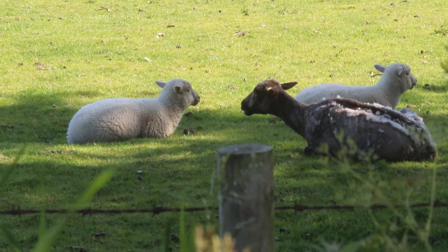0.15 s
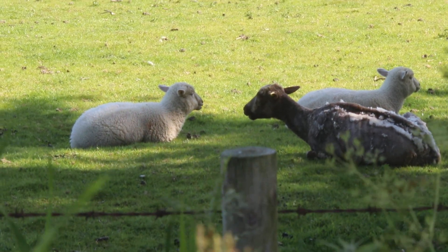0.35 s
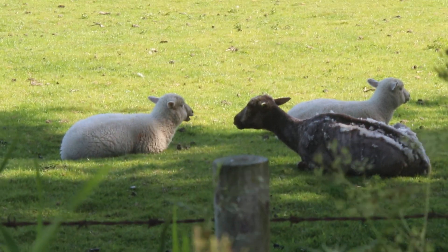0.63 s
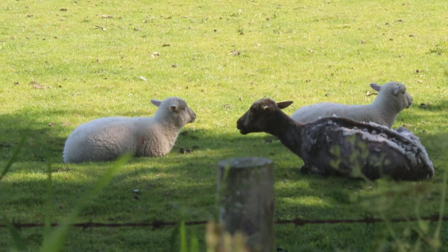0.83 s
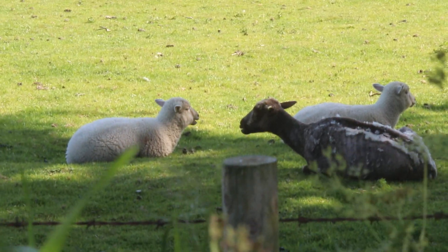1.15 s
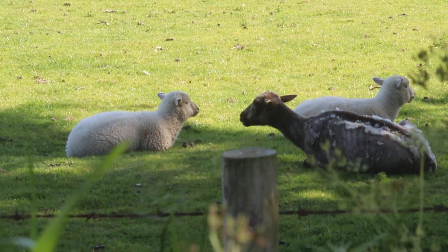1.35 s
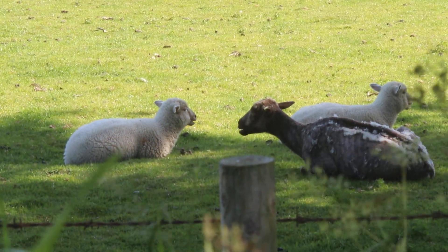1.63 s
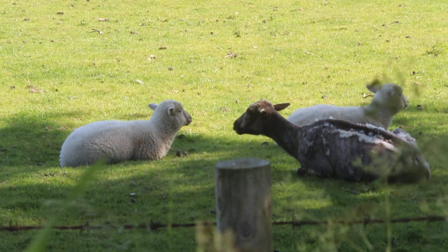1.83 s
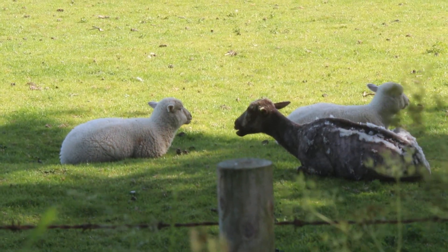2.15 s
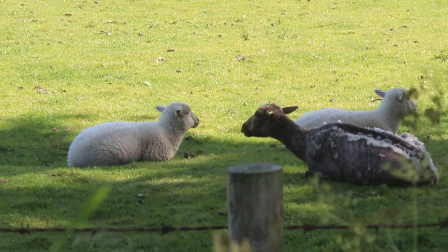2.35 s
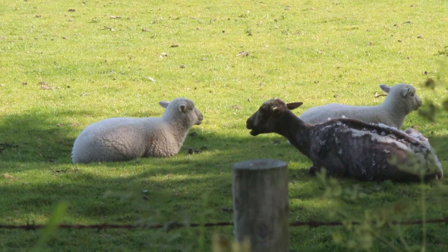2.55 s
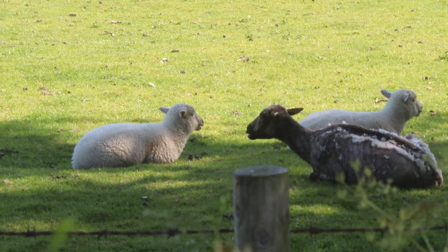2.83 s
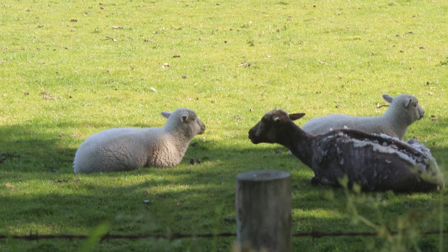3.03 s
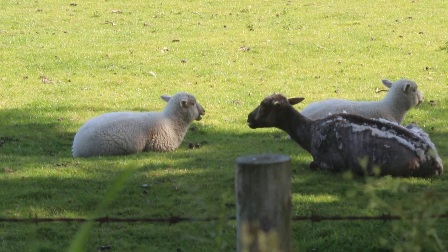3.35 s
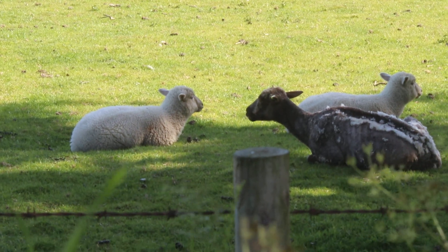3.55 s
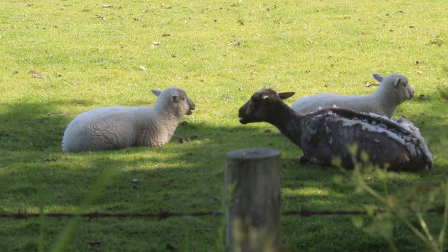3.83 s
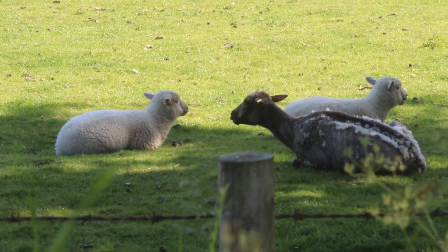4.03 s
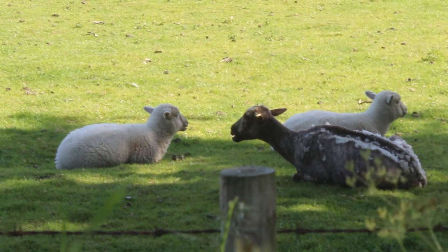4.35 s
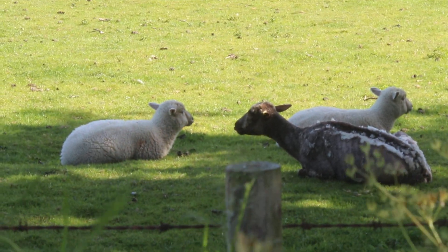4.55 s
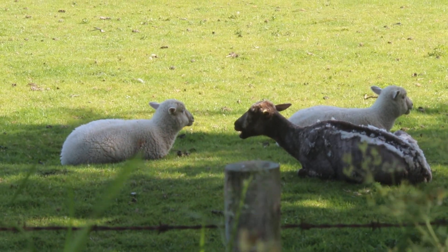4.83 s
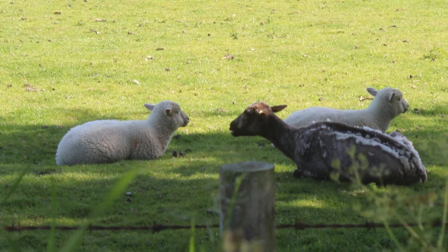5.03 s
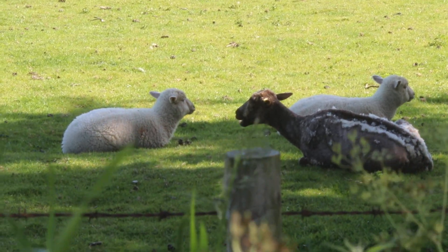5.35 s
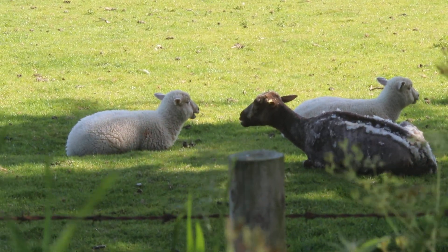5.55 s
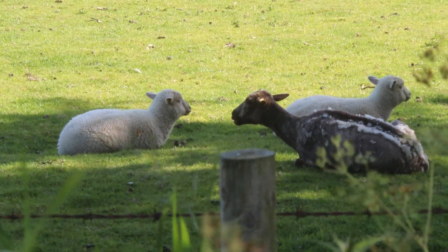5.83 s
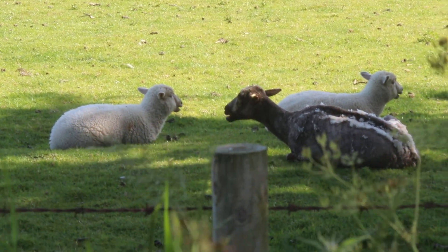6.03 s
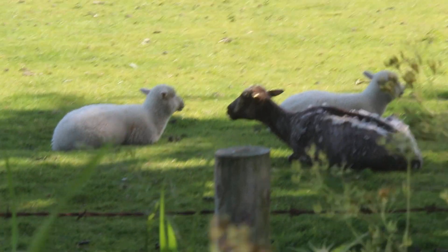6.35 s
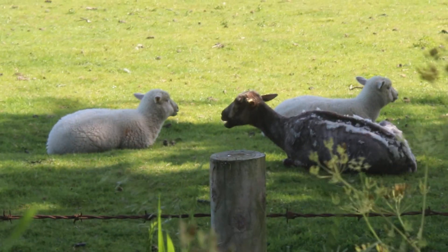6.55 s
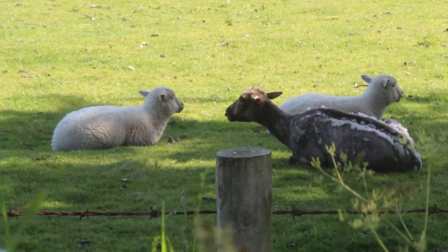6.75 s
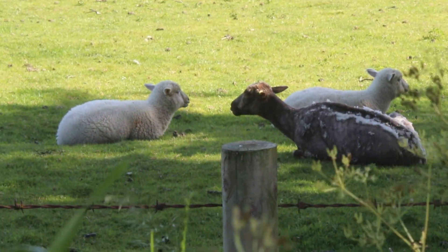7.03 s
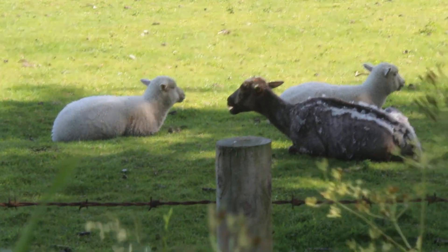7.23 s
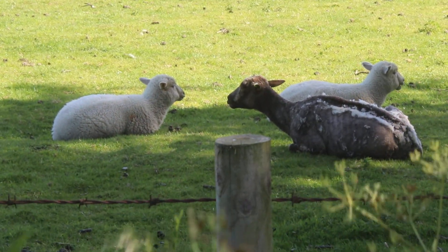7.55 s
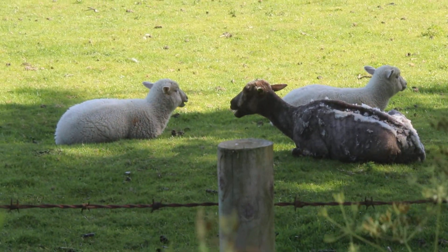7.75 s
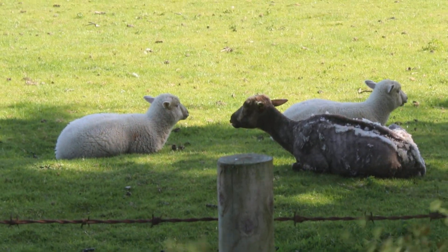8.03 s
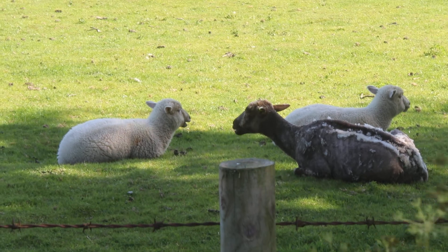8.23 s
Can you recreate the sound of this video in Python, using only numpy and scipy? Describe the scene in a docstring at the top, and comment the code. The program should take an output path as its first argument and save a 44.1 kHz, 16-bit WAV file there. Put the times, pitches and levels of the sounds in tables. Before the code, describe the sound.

Wind noise dominates this outdoor stereo field recording. After a calm opening of gentle rustling foliage and barely audible birds, a hard gust slams in just before three seconds. Uneven puffs, thuds and two sharp knocks shift left and right over the hiss of grass, with a descending-pitch chirping trill and thin whistles. Strong gusts return near seven and eight seconds, clamped and crackly, drowning everything else.

```python
"""Wind and birdsong over a pasture

Three long gusts and many short puffs carry eddies over two microphone ports: random pressure swings,
quicker and higher as the wind stiffens, with single hard thumps, slow swells and two knocks.
Coloured noise and ticks make the grass hiss, noise makes the trees murmur, gliding sines the birdsong.
A limiter clamps the strong gusts, so the grass and the birds duck under them."""
import sys
import numpy as np
from scipy import signal
from scipy.fft import rfft, irfft, next_fast_len
from scipy.io import wavfile
from scipy.ndimage import uniform_filter1d, minimum_filter1d, map_coordinates

SR = 44100
rng = np.random.default_rng(int(sys.argv[2]) if len(sys.argv) > 2 else 0)


def dump_mix(stems):
    """Bounce the given channels to the path in sys.argv[1] as a 16-bit WAV at rate SR."""
    frames = np.atleast_2d(stems).T  # one column per channel
    limited = np.clip(frames, -1, 1)  # hard clip at full scale
    pcm = np.round(limited * 32767).astype(np.int16)
    wavfile.write(sys.argv[1], SR, pcm)


N = 369999

# Lean is left minus right, set before the sides mix; levels are set before the limiter.
# wind under the puffs, a lull then three long gusts: start_s, relative_strength_db
WIND = [(0, -52), (1.15, -51), (1.3, -72), (2.05, -58), (2.3, -31), (2.66, -26), (2.74, -5), (2.85, 0),
        (3.02, -4), (3.36, -21), (3.75, -26), (4.7, -27), (5.33, -31.5), (6.15, -29), (6.3, -20),
        (6.72, -2), (6.98, -14), (7.15, -23), (7.45, -30), (7.76, -4), (7.97, -1), (8.17, -6), (8.26, -4),
        (8.39, -6)]
# veering of the wind from port to port: start_s, lean_db
VEER = [(2.3, -1), (2.9, 6.5), (3.6, -3), (4.3, 2), (5.5, 0.5), (6.7, 0), (7.3, 0.5), (7.7, 4.5), (8.39, 1)]
# short puffs: crest_s, length_s, relative_strength_db, lean_db
PUFFS = [(0.0, .07, -37, 12), (0.128, .06, -34, 19), (0.683, .06, -36, -12), (0.831, .09, -34.5, 10),
         (0.97, .13, -26, 1), (1.1, .14, -37, 7), (2.138, .035, -30, -12), (2.415, .11, -9, 0.5),
         (2.516, .11, -9, -8.5), (3.477, .14, -14, 0.5), (3.6, .11, -12, -4), (3.891, .1, -24, 2),
         (4.104, .07, -22, 5), (4.284, .1, -23, 10), (4.428, .12, -9, 8), (4.529, .09, -11, 7),
         (4.878, .13, -14, 1.5), (5.078, .11, -14, 3.5), (5.218, .1, -19.5, 3.5), (5.382, .05, -25, -1),
         (5.493, 0.1103, -20, -6), (5.675, .15, -5, -1.5), (5.82, .05, -19, 0), (5.931, .08, -18, 2),
         (6.023, .07, -11, -4), (6.419, .09, -12, 5), (6.545, .08, -8, 2), (7.075, 0.0591, -13, -12),
         (7.221, .08, -24, -6), (7.59, .11, -14, 2)]
# reference eddy pitch in a wind of strength BREEZE_DB: start_s, pitch_hz
EDDY_PITCH = [(0, 215), (1.0, 194.9), (2.42, 190.2), (2.58, 349.7), (3.05, 464.7), (4.1, 414.9),
              (5.25, 394.8), (5.9, 410.2), (6.5, 469.9), (7.05, 490.2), (7.55, 420.1), (8.15, 650.1)]
# single hard eddies: centre_s, size_db, lean_db
THUMPS = [(2.389, -1, -1), (2.509, 5, -18), (2.567, 4.5, -4), (2.719, 3.5, 21), (2.745, 4, -5),
          (3.104, 6.5, 5), (3.449, 6.5, -5.5), (3.614, 7, -1), (4.035, -9, 10), (4.387, 4, 5),
          (4.424, 5, 13), (4.539, 2, 1), (4.754, -3, 1.5), (4.811, -7, 4), (4.899, 2, -0.5),
          (5.033, -0.5, 14), (5.054, -4, 4), (5.074, 3.5, 2.5), (5.154, -8.5, -8), (5.586, -1, -9),
          (5.627, 4.5, 8), (5.682, 9, -12), (6.032, 6, 0), (6.241, -3, 1), (6.412, 6.5, 3),
          (6.533, 12.5, -7), (6.654, 10, -4), (6.674, 11, -5), (6.691, 15.5, 3.5), (6.805, 13, -18),
          (7.052, 2.5, -17), (7.086, 6.5, -5), (7.218, -2.5, -0.5), (7.26, -6, 1), (7.707, 8, 7),
          (7.879, 13, 11.5), (8.061, 15, 5.5)]
# colour of a microphone port: frequency_hz, gain_db
PORT = [(40, -2), (200, 0), (700, 0), (1600, -2), (4000, 0)]
# likeness of the two sides at the ports: frequency_hz, correlation (0 to 1)
PORT_ALIKE = [(60, .7), (130, .68), (260, .48), (500, .22), (1000, .05), (2000, 0)]
# relative spectrum of slow pressure swells: frequency_hz, density_db (per Hz)
SWELLS = [(15, 3), (30, -34), (60, -10.5), (110, 11), (170, 12.5), (300, -33)]
# sharp knocks on the microphone, alike on both sides: centre_s, thud_db, snap_db
KNOCKS = [(3.4355, 5, -3), (3.5729, 7.5, -9)]
# stirring of the grass, before flutter: start_s, rustle_db
RUSTLE = [(0, -48.5), (1, -48.5), (1.7, -44.5), (2.3, -43), (2.7, -40), (4.2, -39), (7.3, -37.5),
          (8.4, -42.5)]
# relative spectrum of the grass: frequency_hz, density_db (per Hz)
GRASS = [(200, -5.5), (700, 3), (1500, 2), (2200, 1.5), (3200, -0.5), (4500, -2), (5500, -8), (7500, -7),
         (9000, -10), (11000, -16.5), (13000, -16), (15500, -22)]
# likeness of the two sides for grass and trees: frequency_hz, correlation (0 to 1)
AIR_ALIKE = [(150, 1), (330, 0.9), (700, 0.7), (950, 0.3), (1500, 0.24), (3000, 0.034), (9000, 0)]
# bird whistles, before echo: start_s, length_s, start_hz, end_hz, warble (share of pitch), level_db
WHISTLES = [(0.064, 0.16, 2250, 2510, .01, -57), (0.463, 0.117, 2010, 1930, .015, -58),
            (0.712, 0.25, 2560, 2630, 0.027, -58.5), (3.299, .11, 1710, 1930, 0.0055, -41.5),
            (3.48, 0.17, 1784, 1930, .008, -39), (3.75, 0.18, 1896, 2077, 0.007, -39),
            (3.88, 0.094, 2110, 1975, 0.0091, -38), (4.16, 0.099, 2090, 1940, 0.018, -38),
            (4.26, 0.15, 1843, 1810, 0.0092, -40), (4.46, .11, 2230, 2130, .025, -47),
            (4.87, 0.15, 3250, 3230, .03, -49), (4.951, 0.094, 2810, 2780, .028, -41.5),
            (5.2, .11, 2060, 2160, .014, -39), (5.271, 0.16, 1980, 1760, 0.029, -38.5),
            (5.496, 0.11, 2230, 1900, 0.023, -40)]
# falling two-part chirp, levels for the first of the trill: delay_s, length_s, start_hz, end_hz, level_db
CHIRP = [(0, 0.021, 3630, 3400, -45.5), (0.015, .024, 3040, 2730, -44.5)]
# relative spectrum of the trees: frequency_hz, density_db (per Hz)
TREES = [(20, -21), (30, -16), (60, 2.5), (120, -2), (200, 1), (450, -0.5), (1000, 0), (1500, -7),
         (2200, -11), (4500, -21.5), (12000, -43)]
# low cut of the recorder: frequency_hz, gain_db
LOW_CUT = [(20, -21), (50, -12.5), (90, -6), (140, -3), (300, 0)]

BREEZE_DB = -15
DB_PER_OCTAVE = 43  # gain in wind strength that doubles the eddy pitch
THUMP_RATIO = 1.257  # a hard eddy is tighter, so higher, than those around it
TRILL_START_S, TRILL_PERIOD_S, TRILL_CHIRPS = 3.195, .091, 10
TRILL_FADE_DB = 1  # each chirp is this much fainter than the one before
ATTACK_S = .0035  # time constant of the limiter's gain
TOP_HZ = 15750  # band limit


def amp(db):
    """Logarithmic level: decibels to amplitude gain."""
    return 10 ** (np.asarray(db) / 20)


def unit(x):
    """Power normalisation: scale to rms 1."""
    return x / np.sqrt(np.mean(x ** 2) + 1e-20)


def along(points, hz):
    """Logarithmic interpolation: read (Hz, value) points on a log frequency axis."""
    f, v = np.transpose(points)
    return np.interp(np.log(hz + 1), np.log(f + 1), v)


def curves(rows):
    """Linear interpolation in time: one value per sample for each column after the time."""
    s, *cols = np.transpose(rows)
    return [np.interp(np.arange(N) / SR, s, c) for c in cols]


def wobble(rate):
    """Band-limited random drift: a spline through `rate` random knots a second."""
    knots = rng.standard_normal(int(N * rate / SR) + 4)
    return map_coordinates(knots, [np.arange(N) * rate / SR])


def smooth(x, seconds):
    """Moving average: two equal running means make a triangular window."""
    size = max(int(seconds * SR), 1)
    return uniform_filter1d(uniform_filter1d(x, size), size)


def filtered(x, response):
    """Linear filtering: multiply the spectrum by a response of frequency."""
    m = next_fast_len(N + 8192)
    return irfft(rfft(x, m) * response(np.fft.rfftfreq(m, 1 / SR)), m)[..., :N]


def sides(lean_db):
    """Level difference between sides: left and right gains of mean power 1."""
    g = amp(np.array([lean_db, -lean_db]) / 2).reshape(2, -1)
    return g / np.sqrt(np.mean(g ** 2, axis=0))


def blend(pair, spectrum, alike):
    """Partial coherence: colour two unrelated signals and let each leak into the other side."""
    def turn(hz):
        return np.arcsin(np.clip(along(alike, hz), -1, 1)) / 2

    own = filtered(pair, lambda hz: amp(along(spectrum, hz)) * np.cos(turn(hz)))
    leak = filtered(pair[::-1], lambda hz: amp(along(spectrum, hz)) * np.sin(turn(hz)))
    return own + leak


def patchy_noise(patchy_db):
    """Modulated noise: two noises of joint rms 1 with gain patches drifting over time and frequency."""
    spectra = signal.stft(rng.standard_normal((2, N)), nperseg=512)[2]
    field = uniform_filter1d(rng.standard_normal(spectra.shape), size=7, axis=1)
    field = uniform_filter1d(field, size=14, axis=2)
    noise = signal.istft(spectra * amp(patchy_db * unit(field)), nperseg=512)[1]
    return unit(noise[:, :N])


def airflow():
    """Addition of powers: wind and puffs give port gains, strength in dB and eddy pitch."""
    t = np.arange(N) / SR
    power = (amp(curves(WIND)[0]) * sides(curves(VEER)[0])) ** 2
    for s, length, db, lean_db in PUFFS:
        near = slice(max(int((s - 2 * length) * SR), 0), int((s + 2 * length) * SR))
        bell = np.exp(-(2 * (t[near] - s) / length) ** 2)
        power[:, near] += (amp(db) * bell * sides(lean_db)) ** 2
    strength_db = 10 * np.log10(power.mean(axis=0))
    eddy_hz = curves(EDDY_PITCH)[0] * 2 ** ((strength_db - BREEZE_DB) / DB_PER_OCTAVE)
    return np.sqrt(power), strength_db, eddy_hz


def eddies(at, size, hz):
    """Vortex passage: each is one pressure swing, its spectrum falling exponentially above its pitch."""
    k = np.arange(-300, 301)  # samples from the centre
    angle = np.arctan(np.pi * hz[:, None] * k / SR).astype(np.float32)
    phase = rng.uniform(0, 2 * np.pi, (len(at), 1)).astype(np.float32)
    swing = np.cos(angle) ** 3 * np.cos(3 * angle + phase) * np.hanning(len(k))
    # one spare sample at each end collects whatever falls outside
    where = np.clip(at[:, None] + k + 1, 0, N + 1)
    return np.bincount(where.ravel(), (size[:, None] * swing).ravel(), N + 2)[1:N + 1]


def stream(pitch, clump_db, per_cycle, scatter, size_db, clump_rate, sharp_share, sharp_ratio):
    """Advection: faster air brings more eddies over a port, in clumps; a few are tight and crackle."""
    passed = np.cumsum(pitch) * per_cycle / SR  # expected eddy count so far
    at = np.searchsorted(passed, rng.uniform(0, passed[-1], int(passed[-1])))
    chance = np.clip(rng.standard_normal((len(at), 3)), -2, 2)
    # clumps level off at the top, with deep gaps between them
    clumps = np.minimum(1.35 * wobble(clump_rate), 1.5)
    size = amp(size_db * chance[:, 0] + (clump_db * clumps)[at])
    tight = rng.random(len(at)) < sharp_share * (pitch[at] / 600) ** 2
    hz = pitch[at] * np.exp(scatter * chance[:, 1]) * np.where(tight, sharp_ratio, 1)
    return eddies(at, size * np.where(tight, .6, 1), hz)


def buffeting(port_gain, strength_db, eddy_hz, level_db):
    """Turbulence on the ports: light wind comes in separate flaps, strong wind merges into a roar."""
    clump_db = np.interp(strength_db, [-19, -3], [5.6, 3.0])
    ports = np.array([
        stream(eddy_hz * 0.91, clump_db, per_cycle=1.6, scatter=0.16, size_db=3.5,
               clump_rate=75, sharp_share=.09, sharp_ratio=1.54)
        for _ in range(2)])
    # even out the running power, so that it follows the strength of the gust
    ports /= np.sqrt(np.abs(smooth(ports ** 2, .06)) + 1e-9)
    return ports * port_gain * amp(level_db)


def slack(depth_db, lead_s, width_s):
    """Amplitude modulation: the small eddies thin out just ahead of each hard one."""
    t = np.arange(N) / SR
    dip = np.zeros(N)
    for s, _, _ in THUMPS:
        near = slice(int((s - .05) * SR), int((s + .05) * SR))
        dip[near] = np.maximum(dip[near], np.exp(-((t[near] - s + lead_s) / width_s) ** 2))
    return amp(depth_db * dip)


def thumps(eddy_hz, edge_db, edge_ratio, wake_db, wake_s):
    """Impact of a hard eddy, often on one port: a steep edge, the main swing, then a weaker wake."""
    s, size_db, lean_db = np.transpose(THUMPS)
    at = np.round(s * SR).astype(int)
    hz = THUMP_RATIO * eddy_hz[at]
    ports = []
    for size in amp(size_db) * sides(lean_db):
        edge = eddies(at, size * amp(edge_db), hz * edge_ratio)
        main = eddies(at, size, hz)
        wake = eddies(at + int(wake_s * SR), size * amp(wake_db), hz * 0.92)
        ports.append(edge + main + wake)
    return np.array(ports)


def swells(strength_db, level_db, growth):
    """Large-scale turbulence: slow whorls add a rumble that grows less steeply than the buffeting."""
    rumble = unit(blend(patchy_noise(patchy_db=6), SWELLS, PORT_ALIKE))
    return rumble * amp(level_db + growth * strength_db)


def knocks(thud_hz, snap_hz, rebound_hz, rebound_db, rebound_s):
    """Impulse and rebound: a dull thud has a bright snap on its edge and a lower rebound."""
    s, thud_db, snap_db = np.transpose(KNOCKS)

    def swing(delay, db, hz):
        return eddies(np.round((s + delay) * SR).astype(int), amp(db), np.full(len(s), hz))

    thud = swing(0, thud_db, thud_hz)
    snap = swing(0, snap_db, snap_hz)
    return thud + snap + swing(rebound_s, thud_db + rebound_db, rebound_hz)


def grass(tick_rate, tick_db, flutter_db):
    """Friction noise: countless blades rub into a hiss; nearer stalks tick against each other."""
    rustle_db, = curves(RUSTLE)
    struck = rng.random((2, N)) < tick_rate / SR
    ticks = struck * rng.standard_normal((2, N)) * amp(2.6 * wobble(6.6))
    rub = patchy_noise(patchy_db=1.13) + amp(tick_db) * unit(ticks)
    hiss = unit(blend(rub, GRASS, AIR_ALIKE))
    return hiss * amp(rustle_db + flutter_db * wobble(6.5)) * sides(lean_db=-1.6)


def bird(echo_db, echo_t60):
    """Frequency glides and reverberation: whistles and a second bird's trill, echoed off the trees."""
    song = np.zeros(N + SR)
    trill = [(TRILL_START_S + k * TRILL_PERIOD_S + delay, length, start_hz, end_hz, 0, db - k * TRILL_FADE_DB)
             for k in range(TRILL_CHIRPS) for delay, length, start_hz, end_hz, db in CHIRP]
    for s, length, start_hz, end_hz, warble, db in list(WHISTLES) + trill:
        u = np.linspace(0, 1, int(length * SR))
        waver = map_coordinates(rng.standard_normal(64), [u * length * 120])  # 120 knots a second
        hz = (start_hz + (end_hz - start_hz) * u) * (1 + warble * waver)
        envelope = amp(db) * np.sqrt(2 * np.abs(np.sin(np.pi * u)))
        song[int(s * SR):][:len(u)] += envelope * np.sin(2 * np.pi * np.cumsum(hz) / SR)
    t = np.arange(SR // 2) / SR
    tail = rng.standard_normal((2, len(t))) * amp(-60 * t / echo_t60)
    echo = signal.fftconvolve(song[None, :N], tail / np.linalg.norm(tail[0]), axes=1)[:, :N]
    return song[:N] + amp(echo_db) * echo


def trees(level_db):
    """Broadband flow noise: the nearly steady murmur of wind in distant crowns."""
    murmur = unit(blend(patchy_noise(patchy_db=0.0), TREES, AIR_ALIKE))
    return murmur * amp(level_db + 0.82 * wobble(3))


def scene():
    """Superposition: wind and knocks at the microphone over the sounds of the field."""
    port_gain, strength_db, eddy_hz = airflow()
    roar = buffeting(port_gain, strength_db, eddy_hz, level_db=1.0)
    roar = roar * slack(depth_db=-5, lead_s=0.0088, width_s=0.0085)
    blows = thumps(eddy_hz, edge_db=-27.5, edge_ratio=3.0, wake_db=-2, wake_s=0.00183)
    wind = blend(roar + blows, PORT, PORT_ALIKE) + swells(strength_db, level_db=-33.5, growth=0.37)
    taps = knocks(thud_hz=640, snap_hz=2040, rebound_hz=424, rebound_db=-0.5, rebound_s=.002)
    rustling = grass(tick_rate=250, tick_db=-10.5, flutter_db=1.0)
    song = bird(echo_db=-4, echo_t60=.4)
    return wind + taps + rustling + song + trees(level_db=-44.5)


def limiter(x, threshold_db, sense_s, attack_s, release_db_per_s):
    """Gain reduction by level: the louder side lowers both; the gain recovers at a steady rate."""
    level_db = 10 * np.log10(np.abs(smooth(x ** 2, sense_s)).max(axis=0) + 1e-12)
    excess_db = np.maximum(level_db - threshold_db, 0)
    recovery = release_db_per_s * np.arange(N) / SR
    # hold the largest excess so far, less its recovery since
    cut_db = np.maximum.accumulate(excess_db + recovery) - recovery
    keep = np.exp(-1 / (attack_s * SR))
    return x * amp(-signal.lfilter([1 - keep], [1, -keep], cut_db))


def peak_guard(x, ceiling, hold_s):
    """Peak limiting: a quick dip of gain rounds off the peaks that slip past the limiter."""
    needed = ceiling / np.maximum(np.abs(x).max(axis=0), ceiling)
    return x * smooth(minimum_filter1d(needed, 2 * int(hold_s * SR) + 1), hold_s)


def record(dry):
    """Signal chain: limiter, low cut, peak guard and band limit."""
    held = limiter(dry, threshold_db=-12.0, sense_s=0.0034, attack_s=ATTACK_S, release_db_per_s=96.5)
    trimmed = filtered(held, lambda hz: amp(along(LOW_CUT, hz)))
    guarded = peak_guard(trimmed, ceiling=.98, hold_s=.0006)
    return filtered(guarded, lambda hz: hz < TOP_HZ)


dry = scene()
out = record(dry)
dump_mix(out)
```